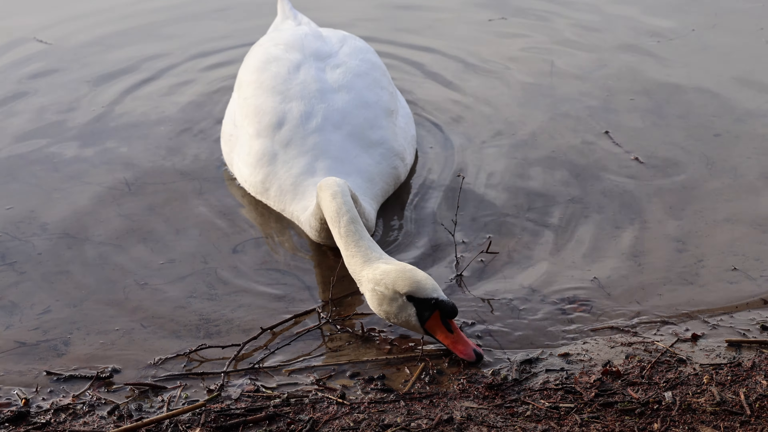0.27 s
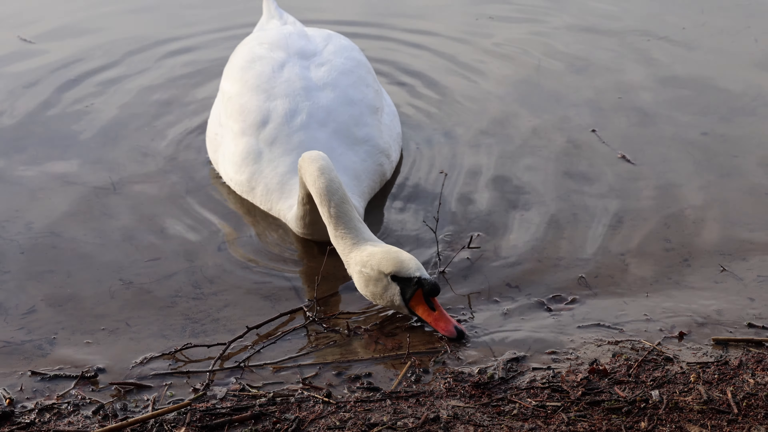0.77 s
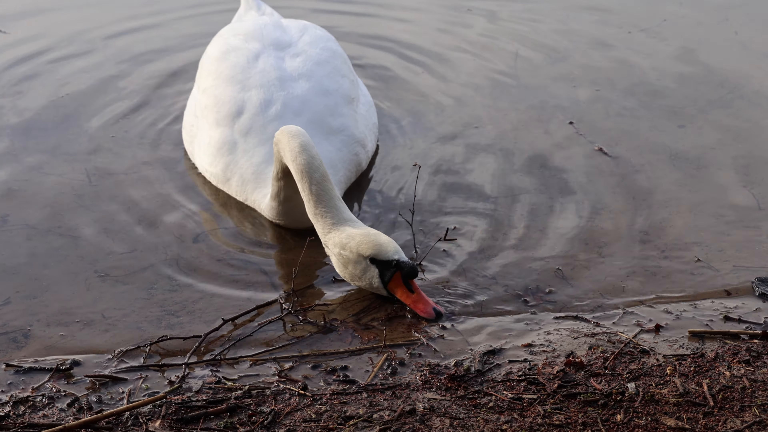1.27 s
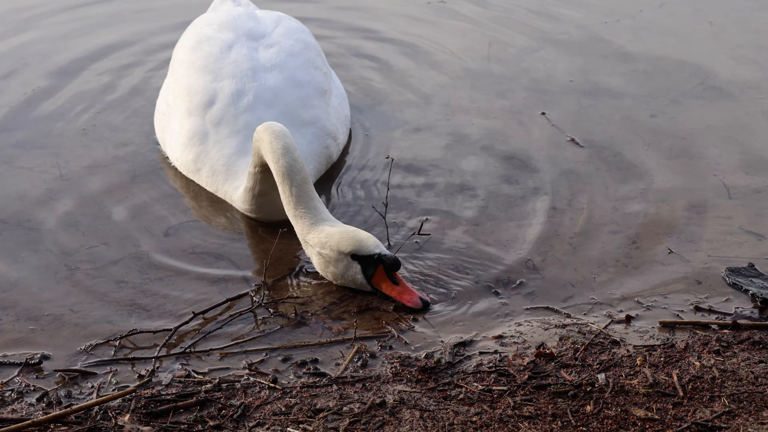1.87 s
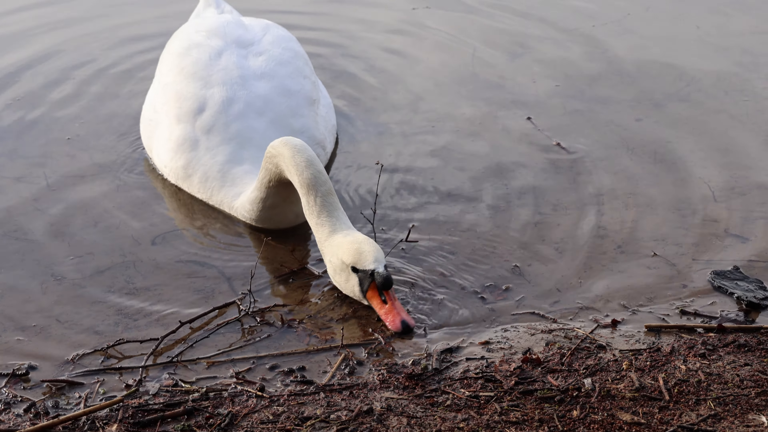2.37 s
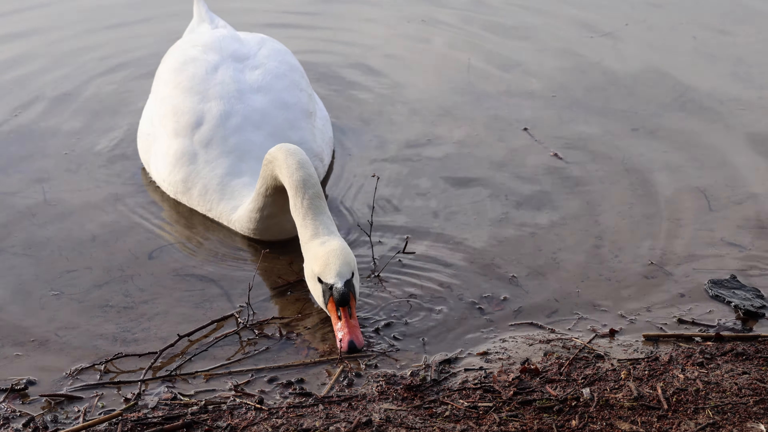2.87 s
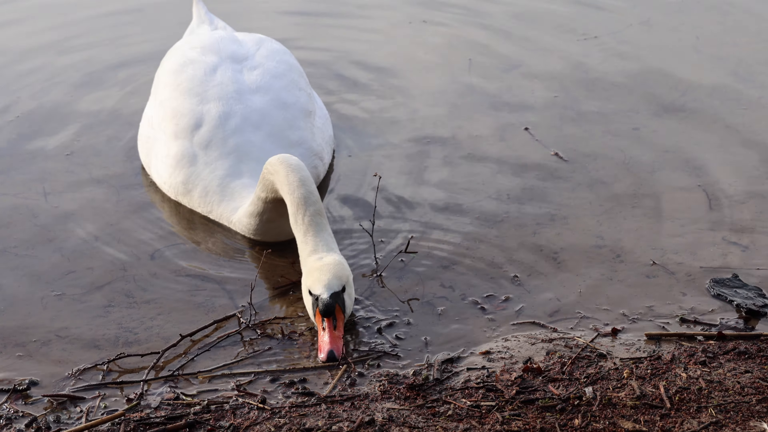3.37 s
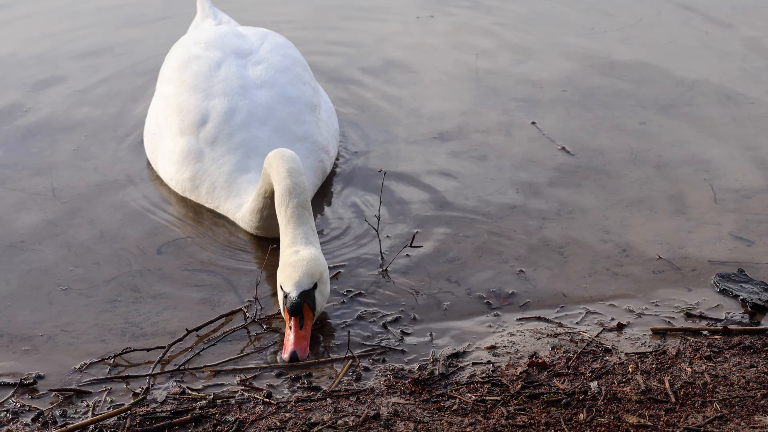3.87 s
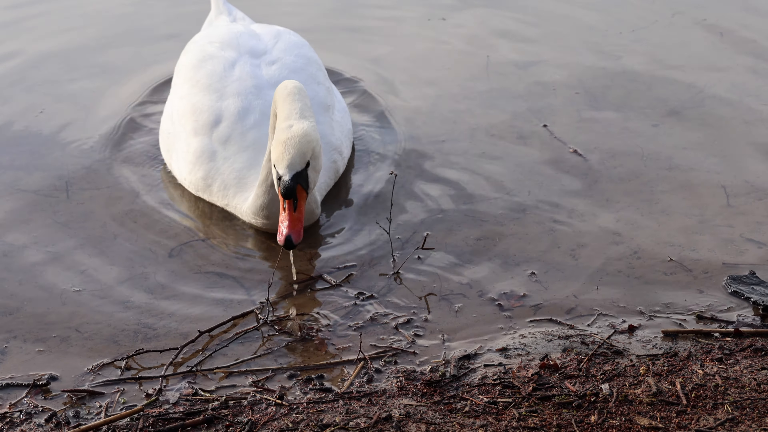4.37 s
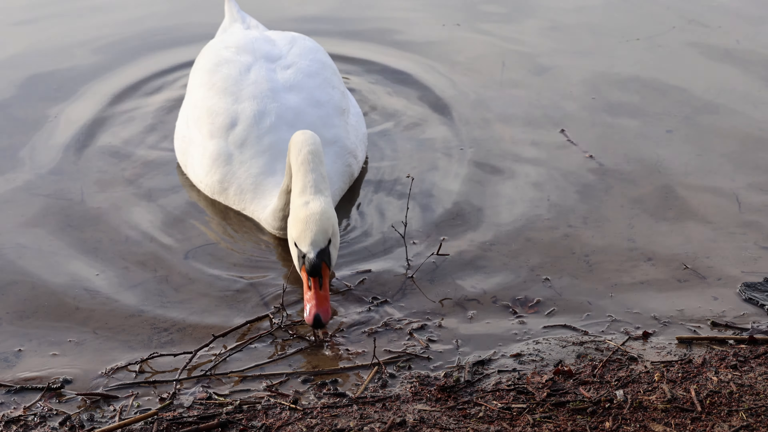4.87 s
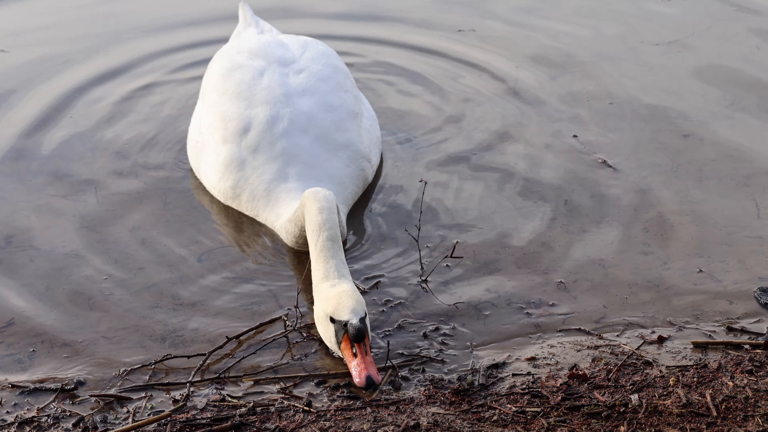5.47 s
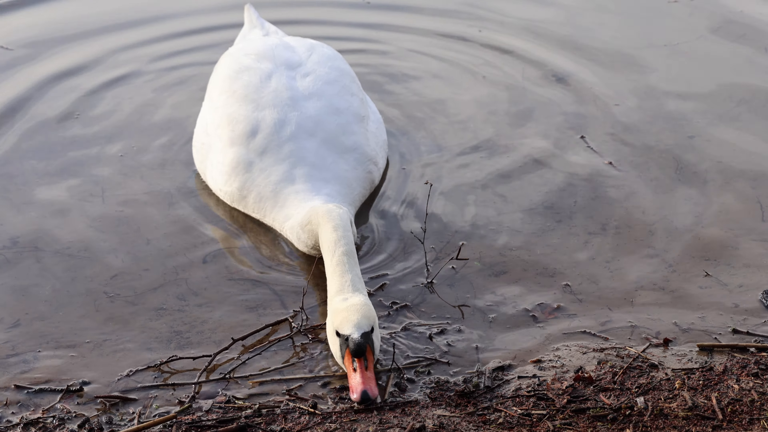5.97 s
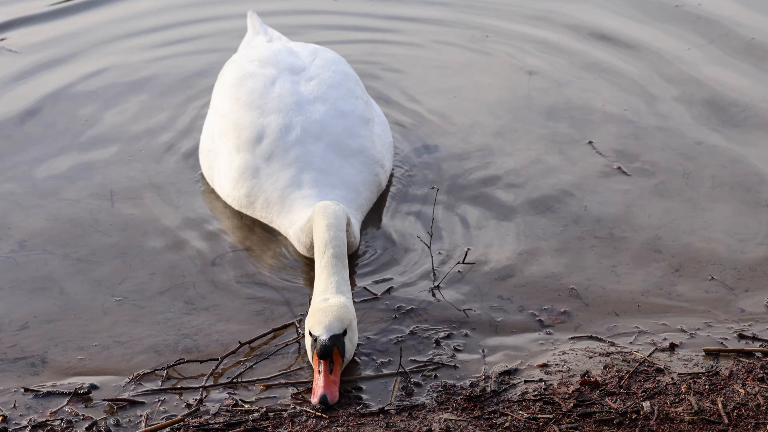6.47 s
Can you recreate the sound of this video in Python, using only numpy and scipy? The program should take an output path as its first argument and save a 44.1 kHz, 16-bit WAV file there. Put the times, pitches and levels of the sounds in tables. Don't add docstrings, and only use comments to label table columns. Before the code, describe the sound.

Close watery snaps and tiny popping bubbles from a feeding swan, a brief hollow gurgle, then sparse drips, with wind bumps and faint distant traffic.

```python
import sys
import numpy as np
from scipy import signal
from scipy.fft import rfft, irfft, next_fast_len
from scipy.io import wavfile
from scipy.ndimage import uniform_filter1d

SR = 44100
rng = np.random.default_rng(int(sys.argv[2]) if len(sys.argv) > 2 else 0)


def pcm_store(signal):
    levels = np.round(np.clip(np.atleast_2d(signal), -1, 1) * 32767)
    wavfile.write(sys.argv[1], SR, levels.astype(np.int16).T)


def magnitude_from_level(level_db):
    exponent = np.asarray(level_db, float) / 20
    return 10 ** exponent


N = 296219

# (time [s], left minus right level [dB], likeness [0-1], left lead [rad])
BILL_PLACE = [(0.45, -9, 0.6, 1.5), (1.3, -4.5, 0.72, 0.8), (1.9, 1, 0.56, -0.8), (2.9, 3.5, 0.5, 1.5),
              (3.05, -5.5, 0.2, 1.5), (3.3, 1, 0.5, -0.6), (3.6, 6, 0.6, 1.16), (3.95, 8, 0.5, 2.1),
              (4.6, 11.5, 0.45, 3.5), (5.1, 13, .6, 1.5), (5.4, 0, 0.47, 0.5), (6.7, -4, 0.6, 1)]


def curve(table):
    time_s, *columns = np.transpose(table)
    return [np.interp(np.arange(N) / SR, time_s, column) for column in columns]


def band(x, hz, width_hz):
    y = signal.lfilter(*signal.iirpeak(hz, hz / width_hz, SR), x)
    return y / np.sqrt(np.mean(y ** 2))


def walk(rate_hz):
    hold = int(SR / rate_hz)
    steps = np.repeat(rng.standard_normal(N // hold + 1), hold)
    return 1.32 * uniform_filter1d(uniform_filter1d(steps, hold), hold)[:N]


def panned(db):
    return np.array([magnitude_from_level(db / 2), magnitude_from_level(-db / 2)]) / np.sqrt((magnitude_from_level(db) + magnitude_from_level(-db)) / 2)


def add_bubble(out, peak_s, db, hz, ms, pan_db, glide, rise, turn_rad):
    u = np.arange(-2 * rise, 4, 1000 / (ms * SR))
    attack = np.exp(-(u / rise) ** 2)
    decay = np.exp(-(np.maximum(u, 0) / (1.15 - rise)) ** 2.43)
    swell = np.where(u < 0, attack, decay)
    phase = 2 * np.pi * hz * ms / 1000 * (u + glide * u ** 2 / 2)
    start = max(int((peak_s - 2 * rise * ms / 1000) * SR), 0)
    tone = np.sin(phase + np.reshape(turn_rad, (2, 1)))
    wave = magnitude_from_level(db) * swell * panned(pan_db)[:, None] * tone
    out[:, start:start + len(u)] += wave[:, :N - start]


def distance():
    # (time [s], level [dB])
    far_level = [(0.0, -64), (0.58, -61), (1.2, -63), (1.48, -58), (2.07, -56), (2.77, -60), (3.8, -56),
                 (4.25, -53), (5.31, -58), (5.87, -57.5), (6.36, -60), (6.72, -57.5)]
    # (frequency [Hz], density [dB per Hz])
    far_colour = [(45, -51), (100, -12), (192, 2), (268, 0.5), (385, -11.5), (935, -5.5), (1700, -11),
                  (3580, -25), (5200, -42.5), (8500, -45), (15500, -59)]
    # (frequency [Hz], left-right likeness [0-1])
    far_likeness = [(300, 1), (700, 0.91), (1400, 0.56), (3000, 0.21), (7000, .02)]
    size = next_fast_len(N)
    octave = np.log2(np.fft.rfftfreq(size, 1 / SR) + 1)
    colour_hz, colour_db = np.transpose(far_colour)
    alike_hz, alike_share = np.transpose(far_likeness)
    colour = magnitude_from_level(np.interp(octave, np.log2(colour_hz), colour_db))
    alike = np.clip(np.interp(octave, np.log2(alike_hz), alike_share), 0, 1)
    mid, side = rfft(rng.standard_normal((2, size)))
    opposed = side * np.array([[1], [-1]])
    pair = colour * (np.sqrt(1 + alike) * mid + np.sqrt(1 - alike) * opposed)
    out = 0
    for k in range(5, 15):
        octave_band = irfft(pair * np.clip(1 - abs(octave - k), 0, 1), size)[:, :N]
        out = out + magnitude_from_level(0.75 * walk(8.1)) * octave_band
    out = out / np.sqrt(np.mean(out ** 2))
    return out * magnitude_from_level(curve(far_level)[0] + 4.0) * panned(0.17)[:, None]


def wind():
    # (time [s], rumble level [dB], left minus right level [dB], depth [dB])
    breeze = [(0.0, -62, 8, -4.5), (0.22, -65, 16, 3), (0.88, -67, -5, 2), (1.5, -64.5, -1, 4.5),
              (2.45, -55.5, 4.5, 1.5), (2.55, -36.5, 19, -6), (2.68, -61, 16, -15), (2.9, -61.5, 4.5, -26),
              (3.07, -50.5, 0, -19), (3.8, -64.5, 11, -14), (4.15, -55.5, -2, 0.5), (4.49, -54, 12, 0),
              (4.58, -54.5, -2.5, 1.5), (4.75, -44, 9, -2), (4.9, -64.5, 6, 7.5), (6.21, -76, -11, 4),
              (6.72, -74, 9, -2)]
    # (frequency [Hz], level [dB])
    rumble_bands = [(70, -7), (110, -1), (160, 2), (230, 1), (320, -2.5)]
    # (time [s], peak level [dB], frequency [Hz], length [ms])
    slaps = [(1.852, -47, 119, 9.9), (5.635, -41.5, 140, 13), (2.546, -30, 172, 4.4),
             (2.179, -39, 179, 6.2), (2.3096, -36.5, 166, 5.5), (2.495, -37.5, 179, 24),
             (2.5278, -19, 187, 5.4), (2.553, -33.5, 321, 13), (2.5892, -27.5, 193, 5.5),
             (2.9715, -27.5, 258, 5.7), (3.2266, -35, 258, 6), (3.5531, -39.5, 248, 5.9),
             (4.2299, -37, 222, 9.7), (4.3722, -36, 185, 4.8), (4.4694, -30.5, 198, 6.8),
             (4.7222, -28.5, 169, 6.6), (4.7538, -30.5, 240, 8.9), (4.798, -27, 186, 5.8),
             (4.8366, -36.5, 177, 21)]
    rumble_db, pan_db, deep_db = curve(breeze)
    eddies = 0
    for hz, db in rumble_bands:
        gust_db = 7.4 / hz * (rumble_db + 71.0)
        depth_db = deep_db * min(105 / hz, 1) ** 3
        level_db = db + 4.6 * walk(25) + gust_db + depth_db
        noise = rng.standard_normal((2, N))
        eddies = eddies + magnitude_from_level(level_db) * band(band(noise, hz, hz / 3.6), hz, hz)
    out = magnitude_from_level(rumble_db - 8.5 + 1.8 * walk(5.9)) * panned(2.1 * pan_db) * eddies
    for (s, db, hz, ms), turn in zip(slaps, rng.random((len(slaps), 2))):
        add_bubble(out, s, db, hz, ms, 18, -.05, .45, 6 * turn)
        add_bubble(out, s - .002, db - 7, 1.67 * hz, 0.58 * ms, 18, -.05, .45, 6 * turn)
    return out


def froth():
    # (time [s], length [ms], level [dB], frequency [Hz])
    froth_runs = [(0.075, 74, -75, 9500), (1.269, 42, -71, 4300), (2.22, 100, -58, 3670),
                  (2.308, 100, -60.5, 3700), (3.131, 81, -57.5, 3340), (3.587, 50, -50.5, 3280),
                  (3.602, 58, -58, 4980), (3.78, 105, -49.5, 3080), (3.86, 127, -56, 1060),
                  (3.924, 57, -52, 2870), (4.091, 62, -59, 1310), (4.108, 38, -51, 3020),
                  (4.101, 160, -50, 438), (4.28, 67, -62, 3400), (4.319, 58, -60, 484),
                  (4.41, 42, -57, 2120), (4.519, 71, -53, 3900), (4.8, 42, -68, 6700),
                  (5.96, 72, -65.5, 8960), (6.239, 41, -68.5, 7800), (6.32, 35, -74, 14000),
                  (6.43, 60, -81, 14000), (6.52, 70, -74, 12400)]
    pitch_spread, length_cycles = 0.091, 4.9
    out, (side_db, _, lead_rad) = np.zeros((2, N)), curve(BILL_PLACE)
    for (s, ms, db, hz), run in zip(froth_runs, rng.random((len(froth_runs), 24, 4))):
        i = int(s * SR)
        near = min(hz / 2200, 1) ** 4
        for when, pitch, size, turn in run:
            bubble_hz = hz * (1 + 2 * pitch_spread * (pitch - .5))
            bubble_ms = 1000 * length_cycles / bubble_hz
            turns_rad = [6 * turn, 6 * turn - near * lead_rad[i]]
            add_bubble(out, s + when * ms / 1000, db + 7 * size, bubble_hz, bubble_ms,
                       1.2 * near * side_db[i], .03, .4, turns_rad)
    return out


def grains(low_hz, high_hz, tilt_db, rate_hz, patchy_db, lead_rad):
    count = int(rate_hz * N / SR)
    shared = rng.integers(0, N - 8, count)
    size_db = 1.7 * np.minimum(rng.exponential(size=count), 2.8)
    size = magnitude_from_level(size_db) * rng.choice([-1, 1], count)
    late, own = rng.integers(1, 7, count), rng.standard_normal(count)
    out = 0
    for place in np.linspace(0, 1, num=6):
        hz = low_hz * (high_hz / low_hz) ** place
        at = np.where(rng.random(count) < .38, shared, rng.integers(0, N - 8, count))
        hits = np.zeros((2, N), np.float32)
        np.add.at(hits[0], at + 3, size)
        np.add.at(hits[1], at + late, size * own)
        ring_filter = signal.butter(2, [hz / 1.055, hz * 1.055], "band", fs=SR, output="sos")
        ring = signal.sosfilt(ring_filter, hits)
        sign = (-1) ** round(5 * place)
        out = out + sign * magnitude_from_level(tilt_db * place + patchy_db * walk(17)) * ring
    alike = np.clip(curve(BILL_PLACE)[1], 0, 1)
    analytic = signal.hilbert(out[0], next_fast_len(N))[:N]
    out[1] = alike * np.real(analytic * np.exp(-1j * lead_rad)) + np.sqrt(1 - alike ** 2) * out[1]
    return out / np.sqrt(np.mean(out ** 2))


def spray():
    # (time [s], level [dB], fineness [dB per droplet
    # size], length [ms])
    bill_smacks = [(0.08, -82.5, 1, 52), (0.299, -76, -4, 20), (0.485, -60.5, -25, 61),
                   (0.519, -47.5, -14, 9.6), (1.194, -50.5, -35, 10), (1.225, -56, -12.5, 45),
                   (1.312, -45.5, -5, 8.2), (1.356, -51.5, -9, 11.4), (1.436, -44, -7, 7),
                   (1.528, -41, -11, 7.4), (1.609, -73, 3, 30), (1.702, -40, -21, 8.2),
                   (1.748, -46.5, -19.5, 17), (1.796, -51, 15, 4.4), (1.885, -43, -8, 47),
                   (1.977, -34, -10, 13), (2.06, -43, -10.5, 13), (2.14, -52, -5, 25),
                   (2.245, -55, -7, 15), (2.328, -53.5, -12, 33), (2.423, -51.5, -4.5, 5.5),
                   (2.732, -73, 8, 12),
                   (2.919, -67, -31, 130), (2.998, -53.5, -10.5, 25), (3.038, -45.5, -5, 3.3),
                   (3.089, -56, -10.5, 30), (3.166, -45.5, -7, 5.1), (3.251, -67, 2, 6.8),
                   (3.583, -49, -28, 32), (3.676, -55, -23, 38), (3.751, -50, -8, 16), (3.78, -48, -3, 22),
                   (3.86, -57, -10, 81), (3.972, -41.5, -3, 7.1), (4.091, -45.5, -10, 30),
                   (4.259, -49, -9.5, 88), (4.395, -43, -10, 75), (4.56, -47, -8, 66), (4.651, -43, -9, 11),
                   (4.879, -62, -17, 3.6), (5.114, -66.5, -0.5, 11), (5.374, -66, -16, 11),
                   (5.626, -56.5, -16, 26), (5.7, -67, -11, 11), (5.758, -60, -10.5, 47),
                   (5.796, -40, -22, 4.8), (6.075, -56.5, -11.5, 9.6), (6.23, -71.5, -2, 29),
                   (6.321, -62.5, -10, 25), (6.428, -53, -16, 3.3), (6.468, -68, -7, 160),
                   (6.622, -67, -3, 21), (6.677, -44.5, -8, 3.6)]
    # (time [s], level [dB])
    stir_level = [(1.08, -75), (1.17, -59), (2.3, -64.5), (2.55, -68), (2.92, -67.5), (3.05, -59.5),
                  (3.5, -70), (3.72, -56), (3.9, -50), (4.7, -54), (4.9, -59.5), (5.25, -65.5),
                  (5.7, -63.5), (6.72, -69)]
    # (level at full stir [dB], growth [dB per dB])
    stir_sizes = [(0, 2), (-11, 2.5), (-16.5, 1.75)]
    # (share of the bill's side [ratio], extra left minus right level [dB])
    spray_sides = [(0.66, 3.5), (0.72, -2), (0, 4.5)]
    # lowest Hz, highest Hz, tilt dB across the range, droplets a second in each ring
    droplets = (3050, 6200, -4, 260), (6900, 10500, -5, 240), (12000, 15300, -3, 220)
    stir_full_db = -51
    power = np.zeros((3, N))
    for s, db, fine_db, ms in bill_smacks:
        u = np.arange(0, 5, 1000 / (ms * SR))
        start = int(s * SR)
        fade = np.minimum(u * ms / 6.8, 1) * np.exp(-(u / 0.9) ** 2.06)
        share_db = np.array([0, fine_db, 2 * fine_db])
        gain = magnitude_from_level(db + share_db - share_db.max() + 3.0)[:, None]
        power[:, start:start + len(u)] += (gain ** 2 * fade)[:, :N - start]
    stir_db = curve(stir_level)[0] - stir_full_db
    side_db, _, bill_lead_rad = curve(BILL_PLACE)
    leads_rad = bill_lead_rad, bill_lead_rad, -1.4
    out = 0
    for burst, (db, growth), (*sizes, rate_hz), lead_rad, (share, pan_db) in zip(
            np.sqrt(power), stir_sizes, droplets, leads_rad, spray_sides):
        shower = .8 * burst * grains(*sizes, 2 * rate_hz, 5.5, lead_rad)
        fizz_gain = magnitude_from_level(stir_full_db + db + growth * stir_db)
        fizz = fizz_gain * grains(*sizes, 3 * rate_hz, 3.5, lead_rad)
        out = out + panned(share * side_db + pan_db) * (shower + fizz)
    return out


def pops():
    # (time [s], peak level [dB], frequency [Hz],
    # length [ms])
    bubble_pops = [(0.4542, -39, 2680, 2.3), (0.485, -46, 4500, 1.2), (0.5218, -32.5, 3530, 1.04),
                   (0.526, -50.5, 9700, 1.3), (0.616, -58, 7650, 2.3), (0.665, -47.5, 6100, 0.99),
                   (0.8241, -48.5, 4030, 3.4), (1.166, -44, 3670, 3.4), (1.1968, -30.5, 5330, 0.51),
                   (1.4408, -35.5, 5800, 1.1), (1.53, -26, 3420, 0.52), (1.53, -39, 9100, 0.38),
                   (1.61, -38, 6400, 0.58), (1.7058, -27.5, 4200, 0.7), (1.885, -34, 3580, 1.8),
                   (1.8997, -22, 5670, 0.34), (1.9302, -33, 3740, 3), (1.973, -32, 4970, 0.43),
                   (1.978, -27, 5970, 0.53), (1.984, -24.5, 4170, 0.75), (2.1608, -29.5, 5600, 0.28),
                   (2.429, -34, 6020, 0.57), (2.503, -51.5, 4720, 2.1),
                   (2.928, -43, 4740, 1.7), (3.0105, -40, 3880, 1.5), (3.026, -38.5, 3500, 0.61),
                 (3.042, -41, 8300, 0.46), (3.0903, -40.5, 2550, 1.9), (3.0965, -37.5, 5500, 0.66),
                 (3.1693, -40, 5000, 1.4), (3.205, -34.5, 6300, 0.42), (3.25, -34.5, 5660, 1.1),
                 (3.3394, -33, 6130, 0.71), (3.342, -41.5, 3100, 1.7), (3.785, -31, 7460, 0.36),
                 (3.8441, -28.5, 5700, 0.73), (3.916, -28.5, 2990, 1.8), (3.977, -34, 5900, 1.17),
                 (4.091, -28, 3260, 0.93), (4.127, -34, 2730, 0.76), (4.27, -27, 4930, 0.86),
                 (4.3212, -37, 3750, 2.8), (4.4135, -36, 2380, 3.4), (4.415, -31, 1525, 7),
                 (4.181, -44, 2600, 9.5), (4.439, -40, 1760, 6.7), (4.4482, -32.5, 3130, 0.52),
                   (4.6117, -31, 3900, 0.6), (4.634, -23, 2240, 1.44), (4.6427, -30.5, 2200, 3.1),
                 (4.6493, -29, 3800, 1.25), (4.7433, -35.5, 4000, 2.6), (4.8805, -39, 6270, 1),
                 (5.0937, -44, 4500, 1.07), (5.452, -45, 3760, 1.5), (5.475, -46, 7240, 0.97),
                 (5.5355, -53, 9060, 1.2), (5.6484, -39, 7000, 0.35), (5.7841, -43.5, 3720, 3),
                 (5.8, -41.5, 7500, 0.8), (5.8362, -45.5, 5200, 0.77), (5.909, -49, 9040, 1.1),
                 (5.946, -41, 8300, 0.49), (5.946, -41.5, 3150, 0.87), (6.0778, -41.5, 2780, 1.5),
                 (6.481, -41, 8700, 0.45), (6.549, -51, 2820, 4.3), (6.5635, -42.5, 8960, 0.53),
                 (6.586, -34, 2160, 2), (6.5844, -34, 3160, 1.63), (6.6814, -44, 3500, 1.5)]
    # (time [s], peak level [dB],
    # frequency [Hz], length [ms])
    film_ticks = [(0.31, -53, 4170, 1.75), (0.311, -59, 7900, 1.1), (0.501, -56, 8040, 1.1),
                  (0.545, -56, 14000, 0.27), (0.955, -56.5, 6100, 0.74), (1.123, -55.5, 6070, 0.94),
                  (1.227, -41, 8500, 0.17), (1.246, -41, 7000, .15), (1.281, -46, 4200, 1.1),
                  (1.3162, -31, 5500, 0.13), (1.359, -36.5, 3270, 0.89), (1.402, -47, 11500, .2),
                  (1.446, -33.5, 10900, 0.36), (1.58, -44, 7850, 0.38), (1.63, -39, 5370, 0.68),
                  (1.63, -36, 8800, .15), (1.6476, -40.5, 5400, .7), (1.68, -48, 5300, 0.81),
                  (1.705, -42, 10200, 0.47), (1.751, -35, 8500, .15), (1.797, -41, 14000, 0.23),
                  (1.894, -49, 11500, .15), (2.063, -37, 3320, 1.1), (2.066, -45, 8000, .15),
                  (2.15, -33.5, 6700, 0.28), (2.156, -35.5, 3200, .8), (2.194, -38, 9500, 0.086),
                  (2.251, -41, 10000, 0.087), (2.283, -51, 13300, .4), (2.332, -35, 5360, 0.27),
                  (2.353, -32, 7500, 0.16), (2.368, -43, 7460, 0.14), (2.514, -49, 5560, .8),
                  (2.94, -57, 7200, .3), (2.968, -48, 5500, 0.5), (3.008, -51, 8000, 0.22),
                  (3.17, -35, 7500, .15), (3.186, -44, 7000, 0.18), (3.256, -36.5, 7100, 0.4),
                  (3.358, -48, 5970, 0.66), (3.536, -61, 8600, .4),
                  (3.678, -43, 5000, 0.17), (3.755, -48, 6500, .12), (3.801, -38, 6000, 0.2),
                  (3.879, -43, 8500, .25), (3.975, -43, 9000, 0.13), (4.075, -29, 3970, 0.44),
                  (4.108, -27, 3600, .35), (4.319, -35, 7700, 0.4), (4.398, -39, 7400, 0.47),
                  (4.564, -35, 8500, 0.16), (4.653, -46, 9500, .15), (4.664, -51, 13000, .3),
                  (4.713, -42, 8550, 0.45), (4.75, -33.5, 5460, 0.32), (4.783, -37, 6130, 0.56),
                  (4.929, -48.5, 7700, .8), (5.073, -53.5, 6950, 1), (5.076, -49, 5240, 1.2),
                  (5.119, -60, 9900, 0.63), (5.288, -49, 3460, 0.7), (5.383, -60, 7740, 0.95),
                  (5.396, -52, 4140, 0.52), (5.435, -48.5, 3600, 1.6), (5.61, -46, 4940, .6),
                  (5.632, -47, 6000, 0.18), (5.648, -48, 4930, .8), (5.707, -48.5, 6200, 0.89),
                  (5.707, -43, 3100, 1.2), (5.763, -48, 8400, 0.4), (5.788, -55, 13000, .3),
                  (5.845, -50, 8500, 0.31), (5.925, -45, 7900, 0.25), (5.99, -54, 3450, 0.98),
                  (6.002, -49, 3360, 0.65), (6.102, -49, 2780, 1), (6.242, -44, 7500, 0.27),
                  (6.345, -53, 4730, 0.61), (6.43, -54.5, 9700, .5), (6.43, -56, 13400, .5),
                  (6.47, -47, 8000, 0.56), (6.469, -50, 4360, 1.5), (6.5013, -39, 9500, 0.19),
                  (6.5175, -43, 9500, 0.18), (6.549, -44, 7500, .7), (6.563, -44, 5000, 0.72),
                  (6.645, -43, 8160, 0.29), (6.681, -48, 8000, .15)]
    shadow_hz, shadow_db = 8100, -7
    round_hz = 2600
    rows = bubble_pops + film_ticks
    out, (side_db, _, lead_rad) = np.zeros((2, N)), curve(BILL_PLACE)
    for (s, db, hz, ms), (turn, skew, stray) in zip(rows, rng.random((len(rows), 3))):
        i = int(s * SR)
        pan_db = side_db[i] * min(hz / round_hz, 1) ** 4 + 9.2 * (stray - .5)
        if hz > shadow_hz:
            pan_db = shadow_db
        turns_rad = [6 * turn, 6 * turn - lead_rad[i] + 1.6 * (skew - .5)]
        add_bubble(out, s, db, hz, ms, pan_db, .03, .3, turns_rad)
        next_s, next_hz = s + 1.2 * ms * skew / 1000, hz * (0.871 + 0.28 * turn)
        turns_rad = [0, 0.9 * (turn - .5) - lead_rad[i]]
        add_bubble(out, next_s, db - 3, next_hz, ms, pan_db, .03, .3, turns_rad)
    return out


def gurgles():
    # (time [s], peak level [dB], frequency [Hz], length [ms])
    air_pockets = [(3.8884, -43, 264, 18), (4.0885, -42, 1090, 8.1), (4.1067, -36.5, 372, 12),
                   (4.1152, -38.5, 626, 13), (4.1248, -36.5, 222, 7), (4.1484, -39.5, 630, 22),
                   (4.1648, -26, 312, 6.5), (4.1915, -29.5, 522, 28), (4.177, -28, 447, 7.7),
                   (4.308, -26.5, 650, 1.95), (4.3356, -41.5, 622, 14), (4.3384, -38, 337, 12.4),
                   (4.4132, -40, 1210, 5.3), (4.4144, -37, 537, 6.4), (5.5753, -36.5, 261, 20)]
    # (time [s], peak level [dB], frequency [Hz], length [ms])
    hollow_tones = [
        (0.527, -48, 822, 27),
        (0.52, -46.5, 1566, 11),
    ]
    out = np.zeros((2, N))
    for (s, db, hz, ms), turn in zip(air_pockets, rng.random(len(air_pockets))):
        add_bubble(out, s, db, hz, ms, 0.3, .2, .5, [6 * turn, 6 * turn + 0.39])
    for s, db, hz, ms in hollow_tones:
        add_bubble(out, s, db, hz, ms, 10.5, 0, .3, [0, 0])
    return out


def scattered(bubbles):
    t_s = np.arange(SR // 20) / SR
    blur = magnitude_from_level(-28.5) * np.exp(-t_s / 0.0096) * rng.standard_normal((2, len(t_s)))
    return bubbles + signal.oaconvolve(bubbles, blur, axes=1)[:, :N]


def scene():
    return distance() + wind() + froth() + spray() + scattered(pops()) + gurgles()


def low_pass(x):
    return signal.sosfilt(signal.butter(12, 16480, fs=SR, output="sos"), x)


def record(dry):
    # (frequency [Hz], width [Hz], level [dB])
    whine_dips = [(5640, 200, -11), (11280, 170, -16)]
    hum_lag, hum_zero, hum_pole = 735, .86, .50
    size = next_fast_len(N + SR // 4)
    hz = np.fft.rfftfreq(size, 1 / SR)
    dips_db = sum(db / (1 + (2 * (hz - f) / width) ** 2) for f, width, db in whine_dips)
    bass_cut = 1 / np.sqrt(1 + (62 / (hz + 1)) ** 6)
    cycle = np.exp(-2j * np.pi * hz * hum_lag / SR)
    comb = (1 - hum_zero * cycle) / (1 - hum_pole * cycle)
    treble_limit = np.where(hz < 15830, 1, .1)
    response = magnitude_from_level(dips_db) * bass_cut * comb * treble_limit
    mix = irfft(rfft(dry, size) * response, size)[:, :N]
    return low_pass(mix)


dry = scene()
out = record(dry)
pcm_store(out)
```